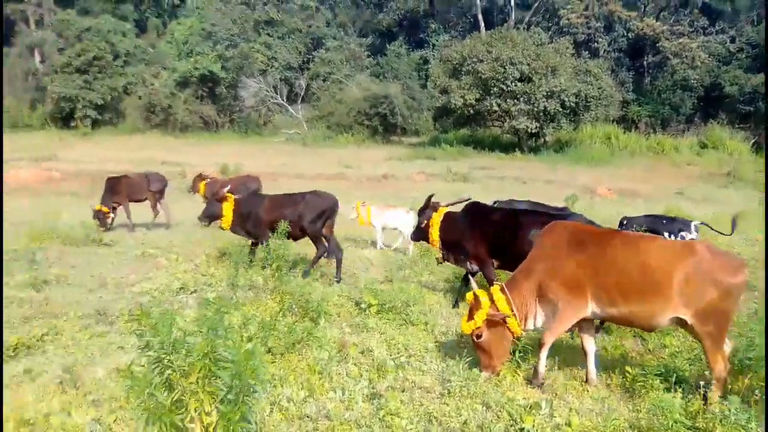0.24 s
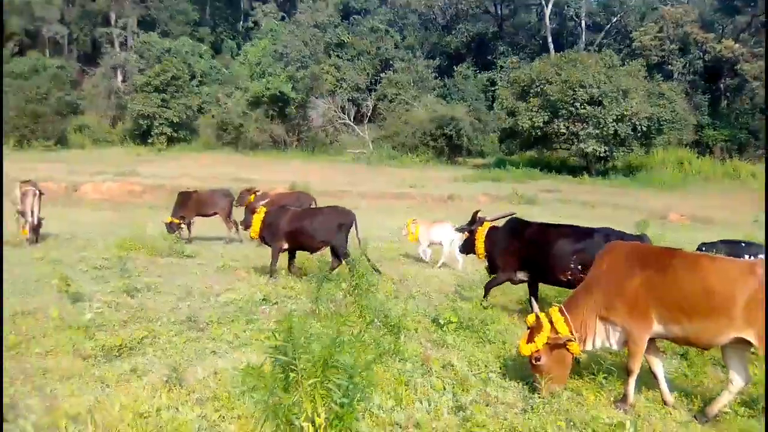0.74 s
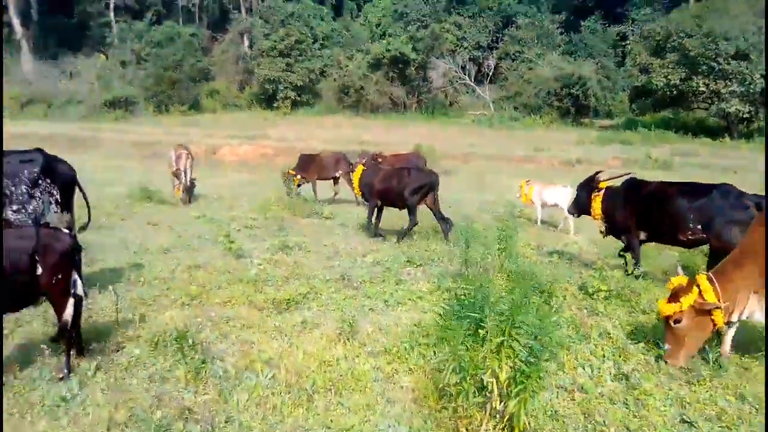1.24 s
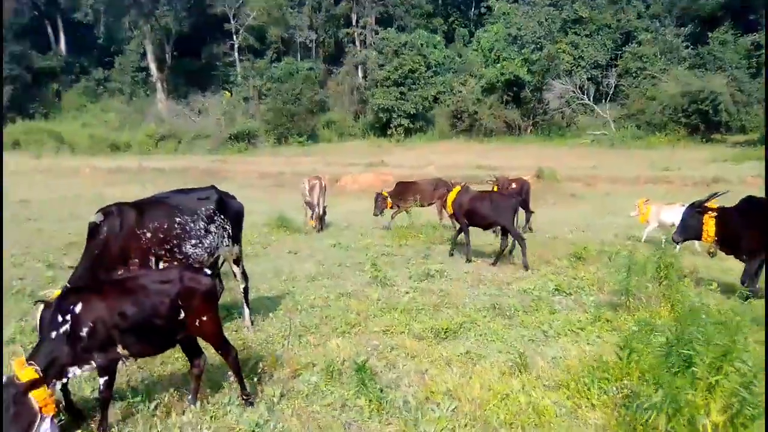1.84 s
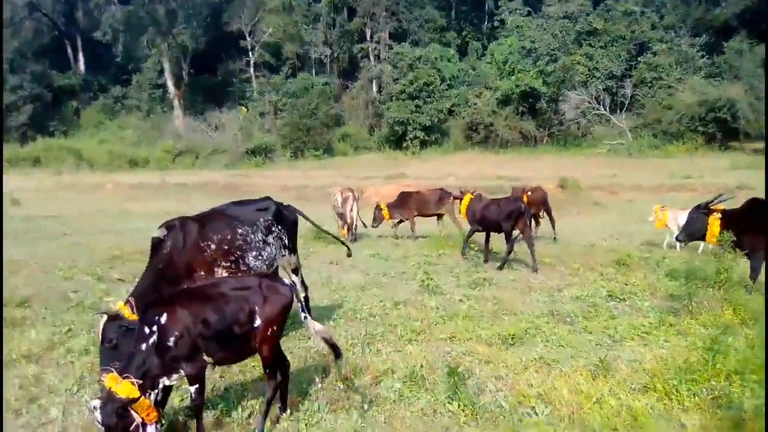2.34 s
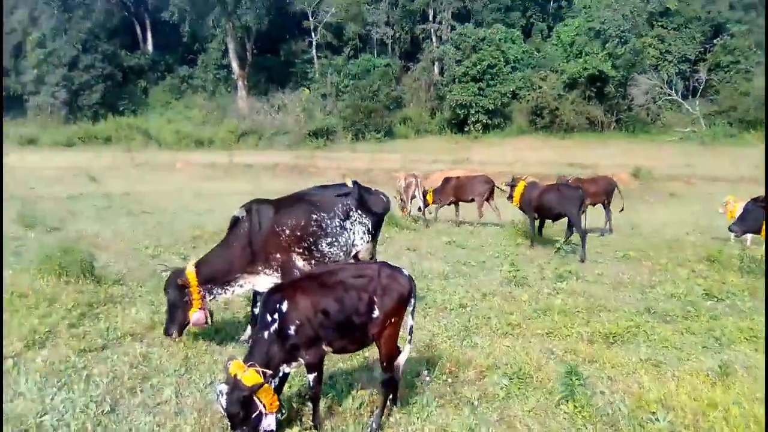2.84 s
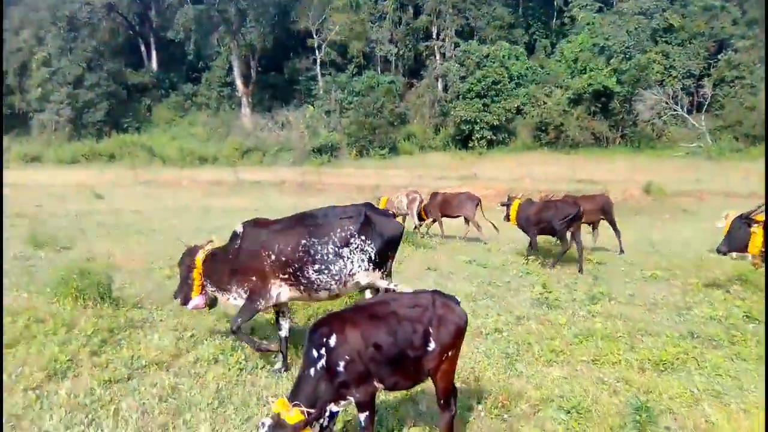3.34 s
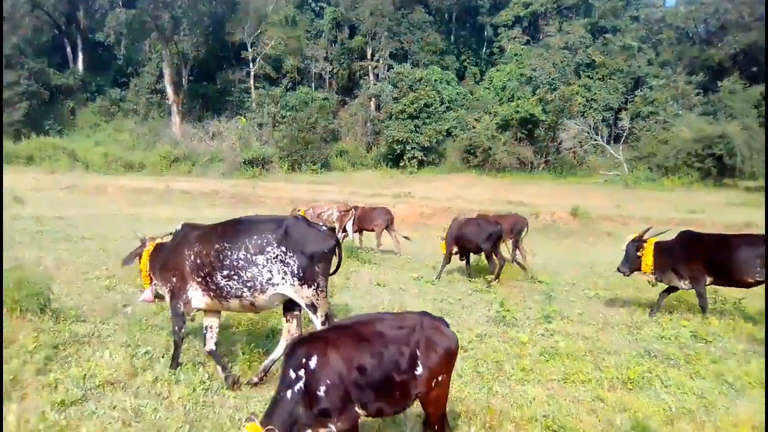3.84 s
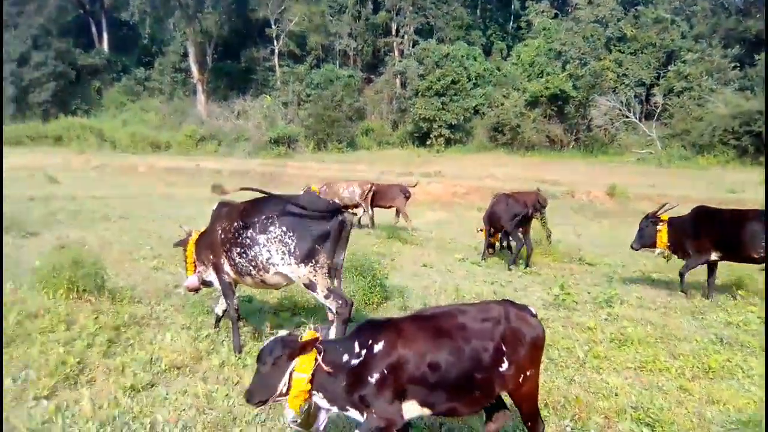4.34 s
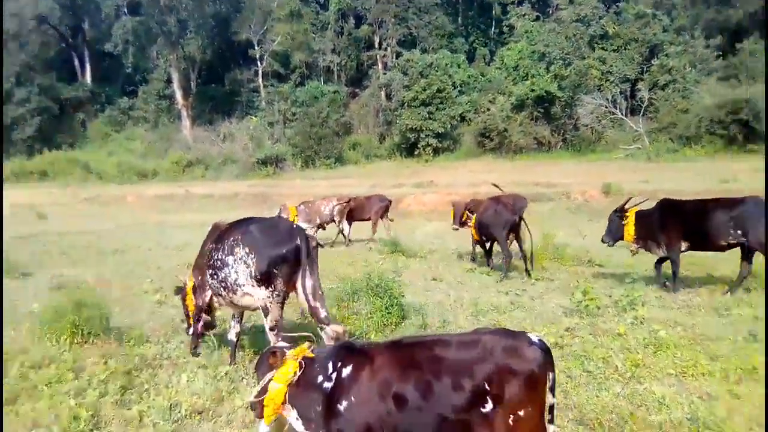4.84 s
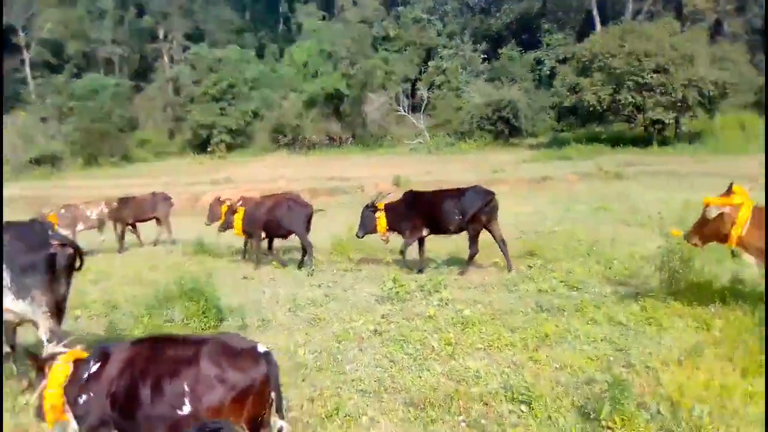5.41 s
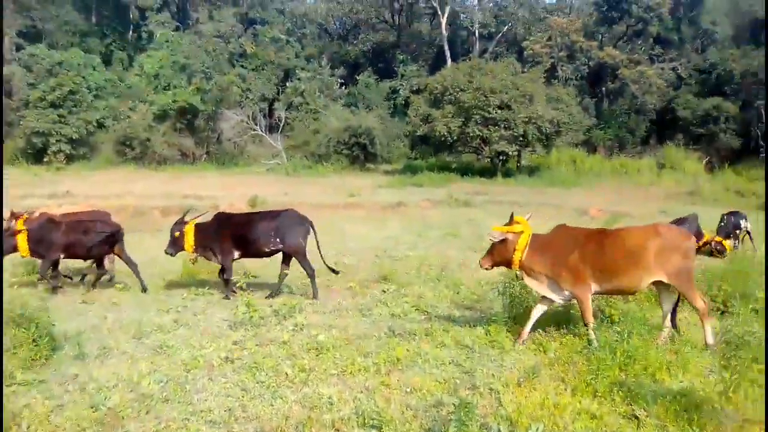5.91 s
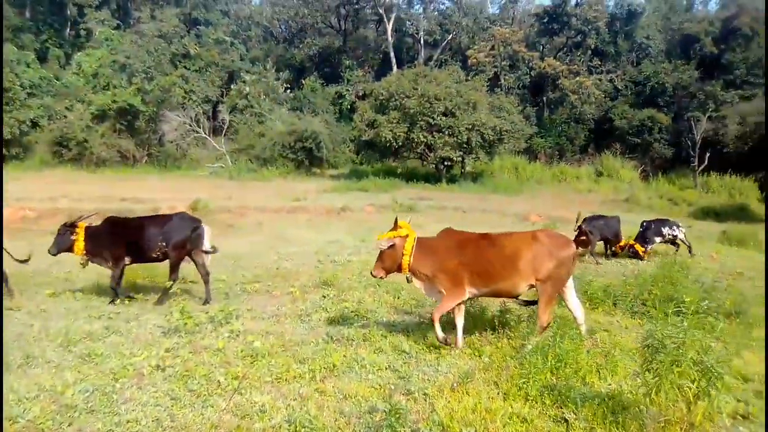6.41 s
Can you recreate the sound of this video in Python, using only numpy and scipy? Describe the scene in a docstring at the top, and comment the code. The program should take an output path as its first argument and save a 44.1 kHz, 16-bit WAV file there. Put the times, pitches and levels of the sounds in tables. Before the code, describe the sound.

A quiet sunny pasture beside trees: soft hush, fluttering high chorus, steady tiny bird twitter and faint crackle of grazing. From 0.3 s skin rubs the microphone case; hollow bumps gather from 0.6 to 1.3 s, with a resonant creak at 0.8 s and the heaviest knock near 1.2 s. Smaller bumps and low groaning grip shifts follow at 1.6-2.2 s. Grass tears softly throughout, and sharp chips sound near 0.9, 2.2 and 2.5 s, the last with a gentle rising whistle. Insect buzzes swell and stop abruptly around 3.2 and 4.1 s. At 3.1-3.45 s a dense, loud flurry of rattling bumps and dry scraping bursts out, trailing to 3.6 s. Crisp stem snaps and tearing grass follow at 3.5-4 s, then a clear chip at 4.1 s. Afterwards it is calmer: light tears, small snaps, a dull knock at 5.7 s, twittering, and a buzz swelling toward the end at 6.7 s.

```python
"""Cattle grazing at a forest edge

Fingers bump, rub and creak on the case that holds the microphone: impulses, jerks and stick-slip ring it.
Grass tears and stems snap near by as shaped bursts of noise; a fainter crackle runs throughout.
Small birds chip, twitter and whistle as gliding tones, the trees scattering a faint tail behind them.
Insects buzz as noise-driven resonances, over a hush and a fluttering chorus of filtered noise."""
import sys
import numpy as np
from scipy import signal
from scipy.fft import rfft, irfft, next_fast_len
from scipy.io import wavfile
from scipy.ndimage import uniform_filter1d

SR = 44100
rng = np.random.default_rng(int(sys.argv[2]) if len(sys.argv) > 2 else 0)


def dump(signal):
    """Clip the signal to [-1, 1] and save it as 16-bit WAV at the path in sys.argv[1]."""
    limited = np.clip(np.atleast_2d(signal).T, -1, 1)
    pcm = np.round(limited * 32767).astype(np.int16)
    wavfile.write(sys.argv[1], SR, pcm)


N = 294147
TIME = np.arange(N) / SR

# transmission of touch through the case to the microphone: frequency_hz, gain_db
CASE_RESPONSE = [(30, -39), (60, -27.5), (110, -15), (148, -20), (172, -31.5), (200, -7.5), (245, -2),
                 (305, -1.5), (380, -4), (470, -6), (600, -3.5), (1000, -8), (1450, -18), (2000, -26.5),
                 (3000, -52)]


def amp(db):
    """Level law: decibels become a factor on amplitude."""
    return 10 ** (np.asarray(db) / 20)


def unit(x):
    """Normalisation: scales a signal to rms 1."""
    return x / np.sqrt(np.mean(x ** 2) + 1e-20)


def read(points, hz):
    """Spectral envelope: interpolates decibels along a logarithmic frequency axis."""
    f, db = np.transpose(points)
    return np.interp(np.log(hz + 1), np.log(f + 1), db)


def add(mix, s, sound):
    """Superposition: adds a sound to the mix from time s in seconds."""
    part = mix[max(round(s * SR), 0):][:len(sound)]
    part += sound[:len(part)]


def colour(x, gain):
    """Linear filtering: multiplies the spectrum by a gain that is a function of frequency."""
    size = next_fast_len(len(x) + 512)
    hz = np.fft.rfftfreq(size, 1 / SR)
    return irfft(rfft(x, size) * gain(hz), size)[:len(x)]


def hump(hz, centre, octaves):
    """Band-pass response: a Gaussian bell on a scale of octaves."""
    distance = np.log2((hz + 1) / centre)
    return np.exp(-.5 * (distance / octaves) ** 2)


def drift(size, rate):
    """Random modulation: noise low-passed near the rate in Hz, with rms 1."""
    return unit(colour(rng.standard_normal(size), lambda f: np.exp(-(f / rate) ** 2)))


def resonate(x, hz, width):
    """Tuned resonance: shifts the curve hz down to zero, smooths there, and shifts back."""
    turn = np.exp(2j * np.pi * np.cumsum(hz * np.ones(len(x))) / SR)
    r = np.exp(-np.pi * width / SR)
    smoothed = signal.lfilter([1 - r], [1, -r], x / turn + 1e-18)
    return 2 * (turn * smoothed).real


def steady(x, size=900):
    """Level regulation: divides a ringing by its running rms, as a steady drive evens it out."""
    x = unit(x)
    power = uniform_filter1d(x ** 2, size=size)
    return unit(x / np.sqrt(power + 0.03))


def field(hush_db=-69.5, chorus_trim_db=-2, flutter_db=3.0):
    """Broadband ambience: a steady shaped noise and a band of chorus whose level flutters."""
    # spectral shape of the hush: frequency_hz, gain_db
    hush_shape = [(30, -19.5), (60, -11.5), (110, -12), (165, -23), (270, -8.5), (470, -10.5), (900, -12),
                  (1900, -9.5), (3150, -13.5), (5000, -11.5), (6400, -18.5), (8300, -20.5), (11000, -24.5),
                  (14300, -22), (15500, -27)]
    # spectral shape of far insects and birds: frequency_hz, gain_db
    chorus_shape = [(3000, -36.5), (3600, -3.5), (4250, 1), (4800, -5), (5400, -2), (6100, -20.5),
                    (7000, -31.5)]
    # level of the far chorus before trim and flutter: time_s, level_db
    chorus_levels = [(0.0, -79), (0.54, -66), (2.19, -71.5), (2.41, -64.5), (2.86, -73), (4.68, -63.5),
                     (4.96, -69.5), (6.67, -70.5)]
    hush = unit(colour(rng.standard_normal(N), lambda f: amp(read(hush_shape, f))))
    chorus = unit(colour(rng.standard_normal(N), lambda f: amp(read(chorus_shape, f))))
    chorus_db = np.interp(TIME, *np.transpose(chorus_levels)) + chorus_trim_db
    chorus_db = chorus_db + flutter_db * drift(N, 30)
    return amp(hush_db) * hush + amp(chorus_db) * chorus


def buzz(size, hz, width_hz=260, strokes_per_s=141, throb=0.8, wander=0.002, shimmer_db=0.5):
    """Amplitude-modulated resonance: even wing strokes throb a narrow ring that wanders a little."""
    phase = 2 * np.pi * strokes_per_s * np.arange(size) / SR
    wings = np.exp(throb * np.sin(phase))
    pitch = hz * (1 + wander * drift(size, 6))
    ring = resonate(rng.standard_normal(size), pitch, width_hz)
    ring = steady(resonate(ring, pitch, 2 * width_hz), size=120)
    return unit(wings * ring * amp(shimmer_db * drift(size, 12)))


def insects(attack_s=.14):
    """Envelope shaping: each call fades in, swells or sags in decibels, then lets go; drones go on."""
    # far insects that never pause: pitch_hz, level_db
    drones = [(7250, -98.5), (9000, -87)]
    # calls: start_s, length_s, level_db (reached at the end, before release), swell_db, pitch_hz, release_s
    calls = [(0, 1.43, -86, 1, 9960, .03), (0.102, 0.35, -76.5, 14, 7250, .02),
             (0.445, 0.82, -72.5, 1.5, 9180, .02), (0.85, 0.6, -87, -2, 6800, .2),
             (1.395, 0.55, -78.5, 11, 7200, .03), (1.803, 0.92, -83, -3.5, 9350, 0.17),
             (2.05, .34, -82, 5, 7550, .03), (2.55, 0.645, -66, 20, 7270, 0.013),
             (2.8, 0.91, -86, 3, 8700, .2), (3.6, 0.514, -66, 16.5, 7120, 0.02),
             (3.7, 0.44, -79, 8, 9200, .03), (4.581, 1.1, -79, -4, 9140, 0.28),
             (5.25, 0.75, -83, 1.5, 9470, .2), (5.85, 0.95, -76.5, 10, 9240, .05)]
    out = sum(amp(db) * buzz(N, hz) for hz, db in drones)
    for s, length, db, swell_db, hz, release_s in calls:
        t = np.arange(0, length, 1 / SR)
        gate = np.minimum(t / attack_s, 1) * np.minimum((length - t) / release_s, 1)
        swell = amp(db + swell_db * (t / length - 1))
        add(out, s, swell * gate * buzz(len(t), hz))
    return out


def fibres(size, per_s, spread_db):
    """Shot noise: each breaking fibre is one impulse at a random instant, of random strength."""
    breaks = rng.random(size) < per_s / SR
    boost_db = spread_db * np.minimum(rng.exponential(1, size), 4)
    return rng.standard_normal(size) * breaks * amp(boost_db)


def grass(trim_db=-1, fibres_per_s=1800, octaves=0.94, sheen_hz=14000, sheen_octaves=0.28,
          herd_db=-78, herd_per_s=130, herd_spread_db=3.0):
    """Filtered shot noise: tears swell quickly with an airy sheen; the rest of the herd crackles on."""
    # grass torn by mouths and brushed by legs:
    # start_s, level_db (before trim and swell), time_scale_s, centre_hz, sheen_db (relative)
    tears = [(0.254, -62, 0.11, 3070, -3), (0.476, -67, 0.38, 4440, -12), (1.342, -64.5, 0.037, 4640, -16),
             (1.634, -63, 0.28, 3600, -5), (2.336, -61, 0.24, 3000, -5), (3.082, -61, 0.33, 3320, -7),
             (3.431, -67, 0.18, 5480, -8), (3.763, -63, 0.19, 4440, -8), (3.975, -59, 0.055, 4840, -14),
             (4.346, -66, 0.11, 4600, -12), (4.508, -68.5, 0.23, 4250, -11.5), (4.609, -64, 0.21, 5220, -2),
             (4.797, -63.5, 0.17, 4020, -10), (5.102, -64, 0.04, 4800, -12), (5.272, -65.5, 0.16, 3560, -8),
             (5.388, -61, 0.04, 4650, -14), (5.733, -64.5, 0.23, 5220, -8), (6.38, -64, 0.096, 4900, -10.5)]
    # response of the blades: frequency_hz, gain_db
    blades = [(600, -13), (1200, -7.5), (2000, 2), (3000, -3.5), (4200, -1.5), (5500, 0.5), (6500, -13.5),
              (9000, -8), (11500, -15), (14000, -6.5), (15500, -10.5)]
    herd = colour(fibres(N, herd_per_s, herd_spread_db), lambda f: amp(read(blades, f)))
    out = amp(herd_db) * unit(herd)
    for s, db, length, centre_hz, sheen_db in tears:
        u = np.arange(int(2 * length * SR)) / (length * SR)

        def tear_gain(f):
            sheen = amp(sheen_db) * hump(f, sheen_hz, sheen_octaves)
            return amp(read(blades, f)) * (hump(f, centre_hz, octaves) + sheen)

        rip = colour(fibres(len(u), fibres_per_s, 0), tear_gain)
        swell = u ** 0.18 * np.exp(-2 * u ** 2)
        add(out, s, amp(db + trim_db) * unit(rip) * swell / swell.max())
    return out


def rub(trim_db=-3.5, rest_db=-86, dull_hz=460, jerks_per_s=70, slide=0.91,
        attack_s=0.0056, release_s=0.042):
    """Sliding friction: skin moves in small jerks and noise that ring the case; strokes hold, then die."""
    # strokes of skin on the case: start_s, length_s (until the release), level_db (before trim)
    strokes = [(0.267, 0.2344, -60.5), (0.432, 0.48, -52), (0.844, 0.18, -40), (0.982, .22, -45.5),
               (1.263, 0.487, -61), (1.652, 0.25, -51.5), (1.933, 0.18, -55), (2.177, 0.65, -63.5),
               (2.922, 0.27, -55), (3.103, 0.25, -41.5), (3.386, 0.05, -36.5), (3.47, 0.093, -39.5),
               (3.587, 0.092, -48), (3.796, 0.36, -57), (5.046, 0.056, -72), (5.26, 0.1, -70),
               (5.55, 0.4, -75), (6.393, 0.071, -75.5)]
    speed = np.full(N, amp(rest_db))
    for s, length, db in strokes:
        rise = np.clip((TIME - s) / attack_s, 0, 1)
        fall = np.exp(-np.maximum(TIME - s - length, 0) / release_s)
        speed = np.maximum(speed, amp(db) * rise * fall)
    jerks = (rng.random(N) < jerks_per_s / SR) * rng.choice([-1, 1], N)
    push = unit(jerks) + slide * rng.standard_normal(N)
    shake = colour(push, lambda f: amp(read(CASE_RESPONSE, f)) * np.exp(-(f / dull_hz) ** 2))
    return amp(trim_db) * speed * unit(shake)


def gliding_tone(s, length, db, *pitches, trim_db=-2, db_per_octave=15, waver=0.003, fading_db=1.5):
    """Frequency glide: one smooth tone, louder when higher, fades in and out and wavers a little."""
    u = np.linspace(0, 1, int(length * SR))
    steps = np.linspace(0, 1, len(pitches))
    hz = np.polyval(np.polyfit(steps, pitches, len(pitches) - 1), u)
    turns = np.cumsum(hz * (1 + waver * drift(len(u), 80))) / SR
    level = db + trim_db + db_per_octave * np.log2(hz / np.median(hz))
    level = level + fading_db * drift(len(u), 25)
    tone = unit(np.sin(2 * np.pi * turns))
    return s, amp(level) * tone * signal.windows.tukey(len(u), .5)


def trees(x, wet_db=-13, t60=0.35):
    """Diffuse reverberation: trunks and leaves scatter a faint tail of decaying noise."""
    t = np.arange(SR // 2) / SR
    tail = rng.standard_normal(len(t)) * amp(-60 * t / t60)
    return x + amp(wet_db) * signal.fftconvolve(x, tail / np.linalg.norm(tail))[:N]


def slur(db, hz, length, fall):
    """Downward chirp: one tiny note whose pitch falls by the given share."""
    u = np.linspace(0, 1, int(length * SR))
    phase = 2 * np.pi * np.cumsum(hz * (1 - fall * u)) / SR
    return amp(db) * np.sin(np.pi * u) ** 2 * np.sin(phase)


def twitter(top_db=-66.5, range_db=6, top_hz=5700, spread=0.2, notes_per_s=25, singers=2,
            note_s=0.024, fall=0.066, steepness=1.5):
    """Chirp series: clear falling notes, over an unbroken, nearly even run from farther birds."""
    # clear falling notes of a far bird: start_s, peak_db, pitch_hz (at the start)
    clear_notes = [(.008, -67, 5400), (.16, -72, 5140), (.2, -65, 5100), (.315, -65, 5550),
                   (.35, -66, 5730), (1.075, -68, 5150), (1.195, -61, 5600), (1.51, -69, 5560),
                   (1.657, -59, 5140), (4.437, -65, 5190), (4.48, -57.5, 5180), (5.2, -67, 5100),
                   (5.542, -63, 5300), (5.605, -62, 5100), (5.955, -67.5, 5530), (6.44, -61, 5140),
                   (6.48, -60.5, 5220), (6.518, -63, 5300)]
    out = np.zeros(N)
    for s, db, hz in clear_notes:
        add(out, s, slur(db, hz, note_s, fall))
    for singer in range(singers):
        # every note draws its own delay, pitch, level, length and steepness
        for k, (late, pitch, faint, stretch, steep) in enumerate(rng.random((300, 5))):
            start = (k + (singer + late) / singers) / notes_per_s
            hz = top_hz * (1 - spread * pitch)
            note_fall = steepness * fall * (.5 + steep)
            add(out, start, slur(top_db - range_db * faint, hz, note_s * (.5 + stretch), note_fall))
    return out


def snaps():
    """Impulsive fracture and impact: a snap or knock is a short burst of band-passed, decaying noise."""
    # snapping stems; the three rows near 5.736 are the parts of one dull knock:
    # start_s, peak_db, pitch_hz, width_octaves, decay_s
    cracks = [(.072, -54, 4200, 0.26, 0.00087), (.203, -56, 1793, 0.6, 0.0011),
              (.403, -54, 1800, 0.6, 0.001), (3.532, -39.5, 5440, 0.16, 0.0013),
              (3.533, -43, 2360, 0.89, 0.002), (3.544, -51, 7000, 1.7, .0011),
              (3.767, -42.5, 4030, 0.12, .001), (3.9815, -39.5, 9000, 1.5, 0.0005),
              (3.982, -36.5, 4700, 0.21, 0.0015), (4.555, -58.5, 5540, 0.54, 0.0009),
              (4.653, -47, 5650, 0.44, 0.0024), (4.719, -55, 5030, 1.4, 0.0014),
              (4.866, -46, 4560, 0.26, 0.0012), (5.566, -44.5, 4860, 0.87, 0.0007),
              (5.713, -49.5, 4560, 0.62, 0.002), (5.736, -45.5, 1510, 0.19, 0.0015),
              (5.7352, -48.5, 2050, 0.12, 0.0015), (5.736, -49.5, 428, 0.51, 0.003),
              (5.785, -52, 4600, 0.4, 0.001), (6.485, -61, 8900, 0.53, 0.001)]
    out = np.zeros(N)
    t = np.arange(-128, 1024) / SR  # the lead-in leaves room for the filter to ring early
    for s, db, hz, octaves, decay in cracks:
        burst = rng.standard_normal(len(t)) * (t >= 0) * np.exp(-abs(t) / decay)
        crack = colour(burst, lambda f: hump(f, hz, octaves))
        add(out, s + t[0], amp(db) * crack / abs(crack).max())
    return out


def chips(trim_db=-3, note_s=0.027, rasp_hz=400, sag=0.0077, attack=0.12):
    """Modulated tone: short, slightly falling notes; random modulation roughens them, up to a tearing."""
    # sharp chips of a small bird; the rough rows at 3.78-3.82 are a burst of tearing grass:
    # start_s, level_db (before trim and envelope), pitch_hz, rasp (0-1)
    notes = [(0.286, -60, 4230, 0.1), (.313, -60, 4240, 0), (.337, -59.5, 4160, 0), (.412, -64, 4330, 0),
             (.44, -64, 4310, 0), (.496, -60, 4310, 0.1), (.543, -65, 4300, 0.05), (0.628, -64, 4300, 0.24),
             (0.881, -48, 4300, 0.33), (.925, -61, 4320, 0.2), (1.084, -64, 4370, 0.1),
             (1.593, -59, 4220, 0), (2.182, -50.5, 4210, 0.33), (2.234, -58.5, 4230, 0.1),
             (2.483, -50, 4330, 0), (2.78, -61.5, 4220, 0.6), (2.933, -56, 4120, 0.43),
             (3.782, -49.5, 3840, 1), (3.784, -43.5, 4230, 1), (3.815, -51, 4160, 0.9),
             (4.07, -44.5, 4302, 0.39), (4.091, -58, 3780, 0.1), (4.284, -56.5, 3970, 0.77),
             (4.384, -52, 4170, 0.94), (4.573, -58, 4190, 0.17), (5.456, -55, 4240, 0.37),
             (5.51, -69.5, 4320, .3), (6.168, -52.5, 4240, 0.5), (6.553, -65.5, 4200, 0.2)]
    out = np.zeros(N)
    u = np.arange(int(2 * note_s * SR)) / (note_s * SR)
    for s, db, hz, rasp in notes:
        grain = (drift(len(u), rasp_hz) + 1j * drift(len(u), rasp_hz)) / np.sqrt(2)
        phase = 2 * np.pi * np.cumsum(hz * (1 + sag * (.5 - u))) / SR
        note = ((1 - rasp + rasp * grain) * np.exp(1j * phase)).real
        envelope = np.minimum(u / attack, 1) * np.exp(-u ** 3)
        add(out, s, amp(db + trim_db) * unit(note) * envelope)
    return out


def bumps(suddenness=0.78, contact_gain_per_s=1430, thin_share=0.11, scuff_s=.005, scuff_share=0.38):
    """Impulse response: a push shakes the case; each contact has its own pitch and length of ring."""
    # fingers bumping the case: peak_s, peak_db (without scuff), brightness_hz, contact_hz, ring_s
    contacts = [(0.353, -44, 1150.0, 410, 0.0036), (0.433, -50, 320.0, 240.0, 0.0018),
                (0.493, -43, 323, 525, 0.004), (0.608, -46, 320.0, 298, 0.0027),
                (0.633, -27, 800.0, 298, 0.0043), (0.648, -34.5, 320.0, 240.0, 0.00079),
                (0.668, -29, 580, 235, 0.0059), (0.68, -30.5, 315, 530.0, 0.0023),
                (0.808, -39, 320.0, 300.0, 0.0035), (0.851, -30.5, 897, 644, 0.0022),
                (0.854, -34, 400, 239, 0.0027), (0.873, -35, 380, 256, 0.0024),
                (0.897, -40, 320.0, 300.0, 0.0044), (0.903, -33, 480.0, 670, 0.0029),
                (0.916, -31, 680.0, 300.0, 0.0015), (0.944, -29.5, 319.5, 298, 0.00476),
                (0.958, -33.5, 603, 296, 0.0025), (0.994, -38, 320.0, 237, 0.0037),
                (1.012, -21.5, 1000, 290, 0.0017), (1.038, -31, 320.0, 240.0, 0.00046),
                (1.05, -36, 480.0, 378, 0.0043), (1.074, -40.0, 320.0, 300.0, 0.0018),
                (1.149, -28.5, 570.0, 280, 0.0046), (1.18, -17.0, 950.0, 468, 0.001),
                (1.2, -24.5, 480.0, 340.0, 0.00042), (1.211, -32, 320.0, 790, 0.004),
                (1.263, -33.5, 320.0, 275, 0.0038), (1.283, -43.5, 402, 238, 0.0027),
                (1.378, -42.5, 400.0, 246, 0.0032), (1.566, -35.0, 400.0, 635, 0.0018),
                (1.603, -38, 320.0, 340.0, 0.00082), (1.658, -30, 480.0, 530, 0.002),
                (1.669, -31.5, 570.0, 240.0, 0.0005), (1.711, -40, 680.0, 420.0, 0.0069),
                (1.726, -39.5, 950.0, 600.0, 0.003), (1.745, -35.5, 800.0, 408, 0.0055),
                (1.761, -35, 420, 323, 0.005), (1.78, -47, 400.0, 272, 0.0047),
                (1.862, -37, 570.0, 418, 0.0052), (1.879, -38, 480.0, 475, 0.0057),
                (1.886, -38.5, 950.0, 387, 0.0047), (1.897, -32.5, 483, 412, 0.0036),
                (2.057, -34, 1150.0, 406, 0.0054), (2.179, -38.5, 940, 474, 0.0031),
                (2.215, -43, 400.0, 380.0, 0.00037), (2.268, -49.5, 800.0, 300.0, 0.0039),
                (2.405, -45, 480.0, 465, 0.0011), (2.948, -30.5, 406, 346, 0.0023),
                (3.08, -37.5, 600, 670, 0.003), (3.11, -30, 800, 378, 0.003),
                (3.122, -24.5, 1400.0, 339, 0.0084), (3.131, -18, 1700, 535, 0.002),
                (3.1425, -21.5, 1400, 650, 0.0033), (3.149, -20.5, 1500, 560, 0.00091),
                (3.156, -18, 1250, 470.0, 0.00091), (3.162, -29.5, 700, 420, 0.0012),
                (3.182, -30, 500, 300, 0.002), (3.195, -27, 1500, 680, 0.002),
                (3.2179, -19.5, 1000, 510, 0.002), (3.233, -26, 1400, 400, 0.001),
                (3.239, -26, 850, 450, 0.0012), (3.274, -25, 321.5, 417, 0.003),
                (3.288, -20.5, 1200, 420, 0.0016), (3.292, -24, 1300, 890, 0.0015),
                (3.301, -23, 420, 290, 0.0037), (3.306, -31, 800, 633, 0.0023),
                (3.311, -25, 1150, 470, 0.0022), (3.319, -21.5, 1200, 497, 0.0036),
                (3.391, -25.5, 570.0, 342, 0.004), (3.402, -20, 1100, 685, 0.00063),
                (3.408, -15.5, 2000, 1142, 0.0012), (3.4116, -17.5, 1500, 470, 0.00089),
                (3.416, -24.5, 698.6, 372, 0.002), (3.422, -20.5, 1300, 710, 0.0016),
                (3.425, -16.5, 1100, 410, 0.002), (3.4288, -21.5, 1400, 900, 0.0012),
                (3.434, -20, 900, 303, 0.0023), (3.439, -24, 650, 320, 0.0017),
                (3.448, -26, 620, 457, 0.003), (3.485, -35.5, 320.0, 303, 0.0027),
                (3.506, -30, 400.0, 676, 0.0036), (3.525, -39, 318, 297, 0.0046),
                (3.552, -30.5, 560, 430, 0.0044), (3.559, -29.5, 670, 383, 0.0037),
                (3.576, -25.5, 870, 355, 0.0022), (3.594, -43, 320.0, 270.0, 0.0018),
                (3.628, -39.5, 318, 340.0, 0.0012), (3.679, -35, 840, 550, 0.0011),
                (3.699, -49, 800.0, 420.0, 0.0019), (3.85, -45.5, 318, 298, 0.0021),
                (3.9, -43, 570.0, 467, 0.001), (3.952, -30.5, 800.0, 493, 0.0069),
                (3.974, -28.5, 800.0, 417, 0.005), (4.025, -47.5, 320.0, 380.0, 0.0048),
                (4.065, -44, 320.0, 420.0, 0.0033), (4.147, -41.5, 315, 530.0, 0.0038),
                (4.323, -53.5, 400.0, 346, 0.0027), (4.7, -49, 1790, 600.0, 0.0021),
                (4.876, -57, 800.0, 266.6, 0.0025), (5.158, -49, 320.0, 236, 0.0026),
                (5.649, -57.5, 320.0, 270.0, 0.004), (6.4, -56, 320.0, 382, 0.00091),
                (6.481, -62, 320.0, 237, 0.0028)]
    size = 4096
    hz, out = np.fft.rfftfreq(size, 1 / SR), np.zeros(N)
    log_gain = np.log(amp(read(CASE_RESPONSE, abs(np.fft.fftfreq(size, 1 / SR)))))
    # flesh lands gradually: less than the full minimum-phase lag lets the ring build over a cycle
    lag = signal.hilbert(log_gain).imag * suddenness
    case = np.exp(log_gain - 1j * lag)[:len(hz)]
    touch = signal.windows.gaussian(size, scuff_s * SR)
    for s, db, bright_hz, ring_hz, ring_s in contacts:
        # the longer a contact rings, the more its pitch stands out
        contact = 1 + contact_gain_per_s * ring_s / (1 + 2j * np.pi * (hz - ring_hz) * ring_s)
        # a quick, bright contact carries little bass
        band = np.exp(-(hz / bright_hz) ** 2) * hz / np.hypot(hz, thin_share * bright_hz)
        push = case * contact * band
        thud = np.fft.fftshift(irfft(push))
        # the landing fingertip also scuffs for a moment
        scuff = thud.std() * unit(irfft(push * rfft(rng.standard_normal(size) * touch)))
        swell = abs(signal.hilbert(thud))
        add(out, s - swell.argmax() / SR, amp(db) * (thud + scuff_share * scuff) / swell.max())
    return out


def pressure(length, skew=1.8):
    """Skewed force pulse: progress 0-1 through a press, and its slow build and quicker let-go."""
    u = np.linspace(0, 1, int(length * SR))
    return u, abs(np.sin(np.pi * u ** skew))


def creak(s, length, db, slips_per_s, stiffness, dry, grit_db, jitter=0.22, scrape=0.85,
          grit_hz=1450, grit_octaves=0.35, range_db=11, bend_share=0.08, ring_db=-7, ring_t60=.24,
          easy_hz=1300, high_mode_effort=2.2, spray_db=-28.5, spray_hz=3300, spray_octaves=0.4):
    """Stick-slip friction: slips ring modes that tighten with force and ring on; a loose grip rasps."""
    # modes of the contact: frequency_hz (before stiffness and bend), width_hz, gain_db
    modes = [(580, 46, -6.5), (655, 51, -3.5), (746, 30, -5.5), (1250, 120, -25), (1396, 60, -20),
             (1562, 30, -16), (1760, 50, -23.5), (2012, 55, -21.5)]
    # spectrum of dry skin scraping: frequency_hz, gain_db
    rasp_shape = [(250, -13), (650, 11), (1000, -1.5), (1350, -7.5), (1750, -10.5), (2200, -26),
                  (3800, -29), (6000, -54)]
    _, force = pressure(length)
    after = (0, int(ring_t60 * SR))
    # loudness, slip rate and pitch rise with the force
    press = amp(range_db * (force - 1)) * signal.windows.tukey(len(force), .15)
    press = np.pad(press, after)
    bend = 1 + bend_share * (np.maximum.accumulate(np.pad(force, after)) - 1)
    size = len(press)
    since_peak = (np.arange(size) - force.argmax()) / SR
    ring_out = (since_peak > 0) * amp(ring_db - 60 * abs(since_peak) / ring_t60)

    slip_rate = slips_per_s * bend * np.exp(jitter * drift(size, 150))
    slips = np.diff(np.floor(np.cumsum(slip_rate) / SR), prepend=0)
    drive = unit(slips) + scrape * rng.standard_normal(size)
    tuning = stiffness * bend
    tone = 0
    for hz, width, mode_db in modes:
        pitch = hz * tuning
        ring = steady(resonate(resonate(drive, pitch, width), pitch, 2 * width))
        # high modes need more force to sound
        effort = 1 + high_mode_effort * max(np.log2(hz / easy_hz), 0)
        tone = tone + amp(mode_db) * ring * np.maximum(press ** effort, ring_out)

    def rasp_gain(f):
        return amp(read(rasp_shape, f) + grit_db * hump(f, grit_hz, grit_octaves))

    rasp = unit(colour(drive, rasp_gain))
    # a tight contact hisses finely at the height of the press
    hiss = unit(colour(drive, lambda f: hump(f, spray_hz, spray_octaves)))
    spray = amp(spray_db) * press ** 2 * hiss
    return s, amp(db) * ((1 - dry) * (tone + spray) + dry * rasp * press)


def groan(s, length, db, hz, fall=0.18, width_hz=190, upper_db=-9, upper_ratio=1.48):
    """Friction-driven resonance: slowly dragging skin judders in two loose, falling resonances."""
    u, force = pressure(length)
    pitch = hz * (1 + fall * (.5 - u))
    drag = rng.standard_normal(len(u)) * amp(1.5 * drift(len(u), 64))

    def loose_ring(curve):
        return unit(resonate(resonate(drag, curve, width_hz), curve, width_hz))

    judder = loose_ring(pitch) + amp(upper_db) * loose_ring(pitch * upper_ratio)
    return s, amp(db) * np.sqrt(force) * unit(judder)


def scene():
    """Superposition of sources: handling at the microphone, the herd near by, birds and insects behind."""
    # whistles from the forest; the last two rows are the faint ringing tone of the creaking case:
    # start_s, length_s, level_db (before trim), then pitch_hz at five even steps from start to end
    glides = [(0.001, 0.151, -71.5, 2250, 2225, 2195, 2165, 2135),
              (.335, 0.34, -75, 2100, 2200, 2270, 2260, 2190),
              (.69, 0.125, -74, 2300, 2345, 2370, 2360, 2320),
              (2.435, .29, -67.5, 1780, 1740, 1785, 2060, 2215),
              (2.461, 0.226, -70.6, 1470, 1590, 1640, 1635, 1545),
              (2.907, 0.072, -69.2, 2220, 2228, 2230, 2228, 2220),
              (3.062, .098, -70.2, 2260, 2280, 2290, 2285, 2270),
              (3.2, 0.13, -66, 1700, 1650, 1620, 1605, 1595),
              (3.33, 0.08, -72, 1605, 1602, 1600, 1595, 1590)]
    # a fingertip sticking and slipping: start_s, length_s (of the press), level_db,
    # slips_per_s (at full force), stiffness (factor on the modes), dry_rasp (0-1), grit_db
    stick_slips = [(0.813, 0.081, -28, 98, 1, 0.14, -3), (3.111, 0.047, -46, 156, .9, 1, 8),
                   (3.149, 0.051, -36.5, 273, 0.79, 0.88, 5.5), (3.17, .06, -40.5, 203, 1, 0.5, 12.5),
                   (3.222, .1, -52, 117, 1, .8, 5), (3.399, 0.054, -44, 200, 0.95, 0.4, -4)]
    # the grip shifts with a low groan: start_s, length_s, level_db (before the force envelope),
    # pitch_hz (midway)
    grip_shifts = [(1.671, 0.11, -53, 444), (1.768, 0.076, -58, 427)]
    hand = rub() + bumps()
    scattered = twitter() + chips()  # all that the trees reverberate
    for row in glides:
        add(scattered, *gliding_tone(*row))
    for row in stick_slips:
        add(hand, *creak(*row))
    for row in grip_shifts:
        add(hand, *groan(*row))
    return (hand + grass() + snaps() + trees(scattered) + insects() + field())[None]


def record(dry, edge_hz=15600):
    """Band limitation: a linear-phase low-pass removes what lies above the edge."""
    low_pass = signal.firwin(511, edge_hz, window=("kaiser", 9), fs=SR)
    return signal.oaconvolve(dry, low_pass[None], "same")


dry = scene()
out = record(dry)
dump(out)
```